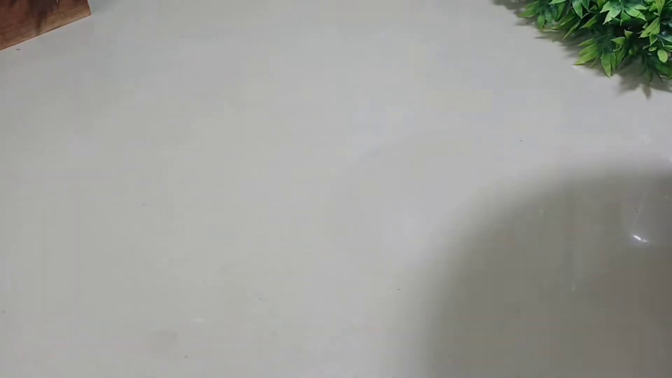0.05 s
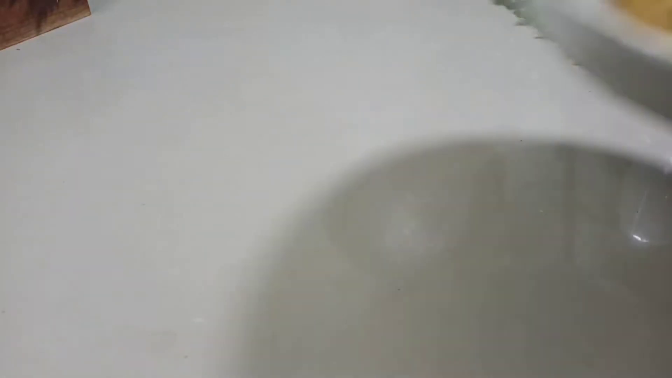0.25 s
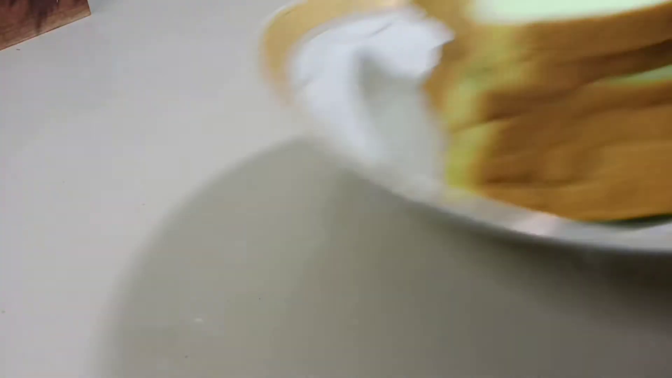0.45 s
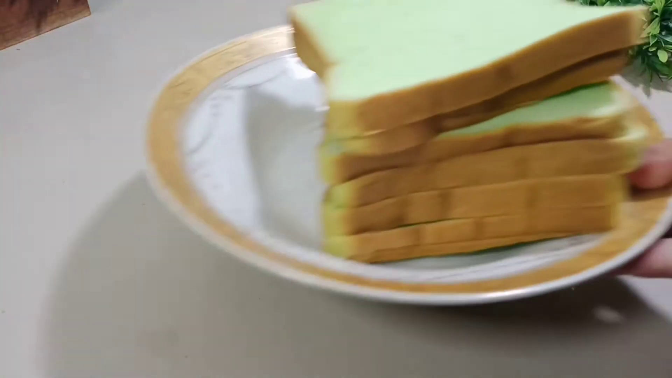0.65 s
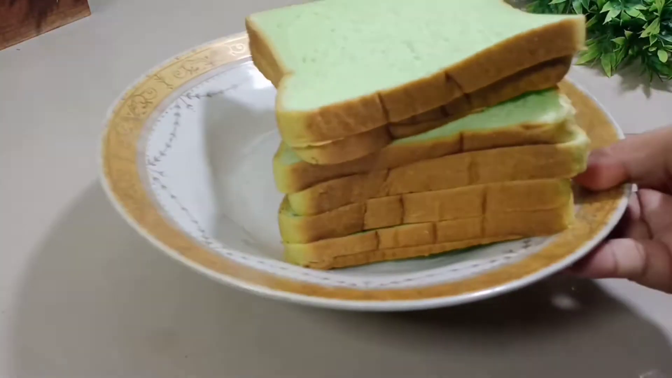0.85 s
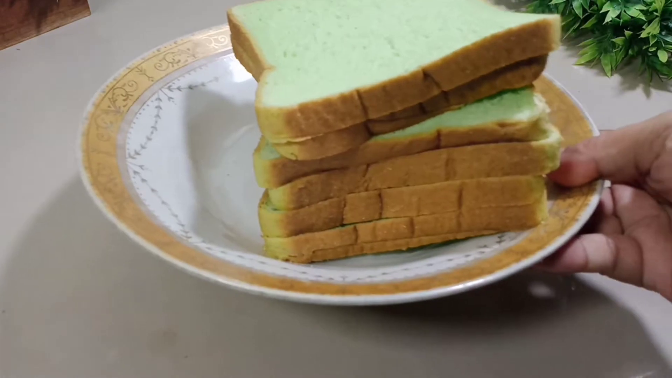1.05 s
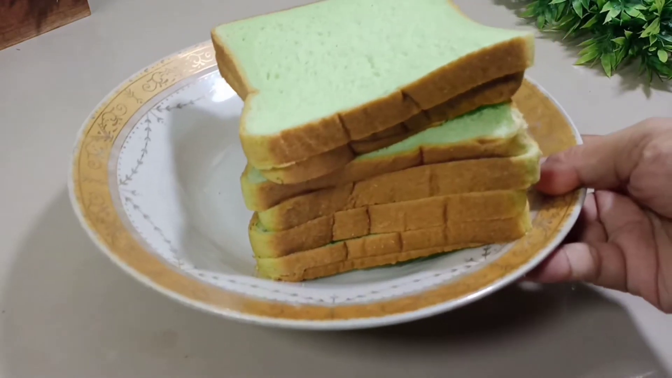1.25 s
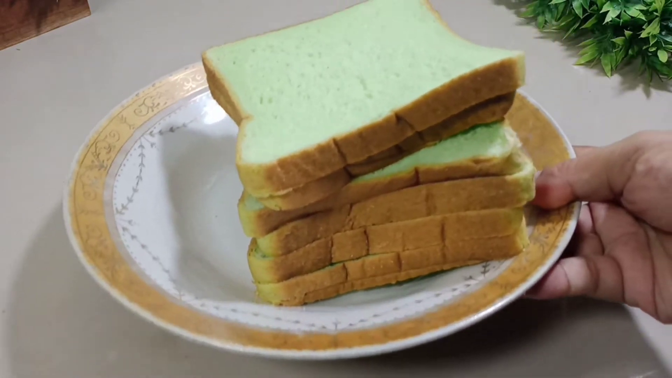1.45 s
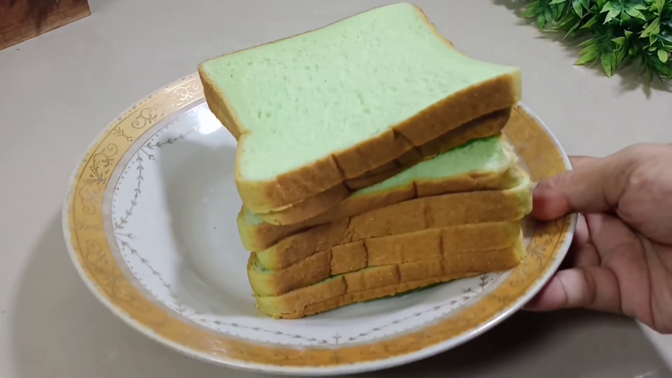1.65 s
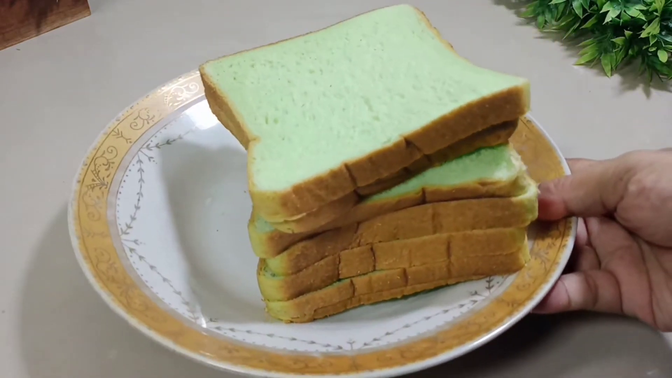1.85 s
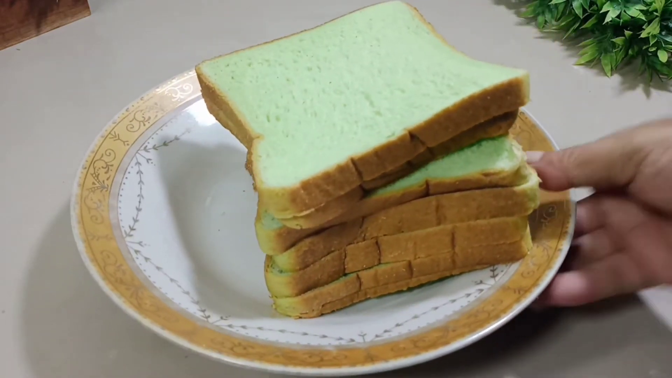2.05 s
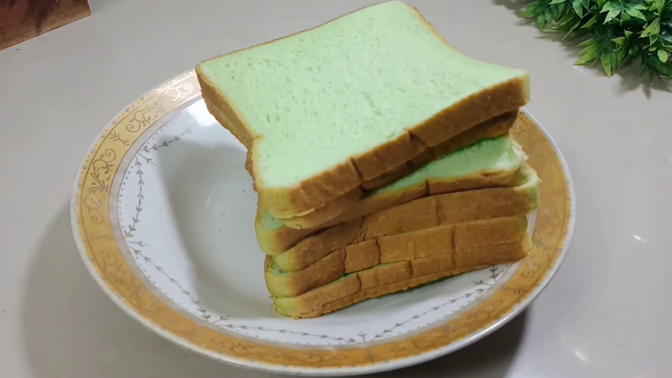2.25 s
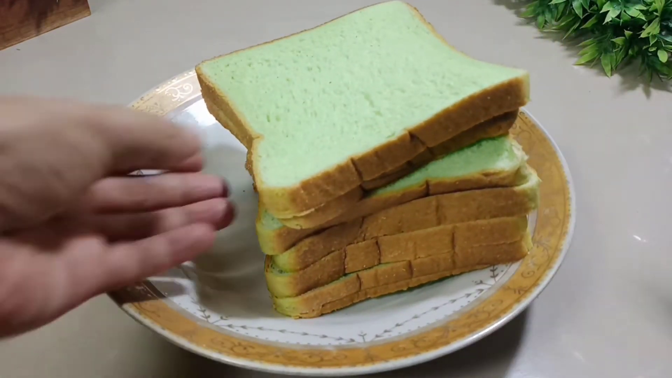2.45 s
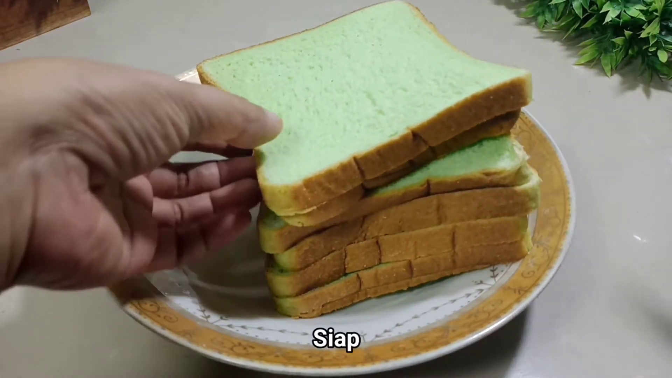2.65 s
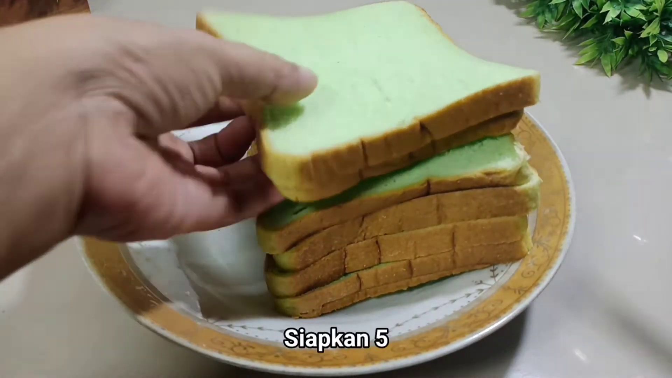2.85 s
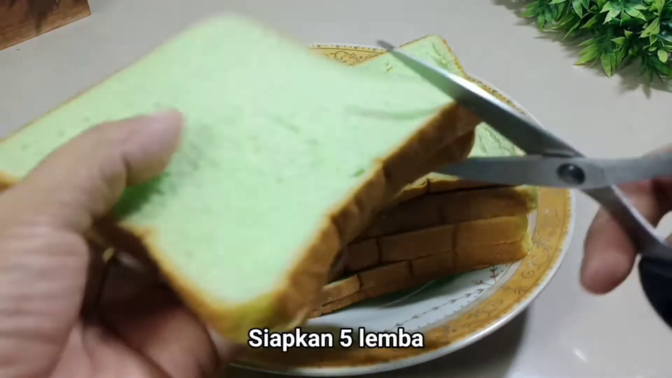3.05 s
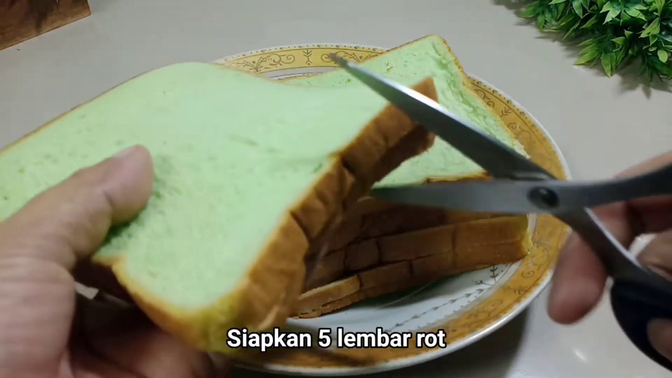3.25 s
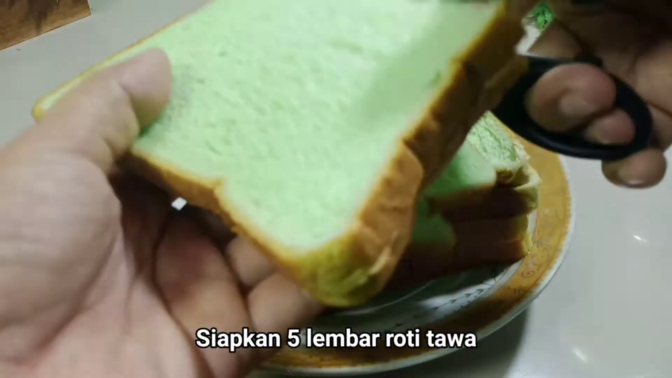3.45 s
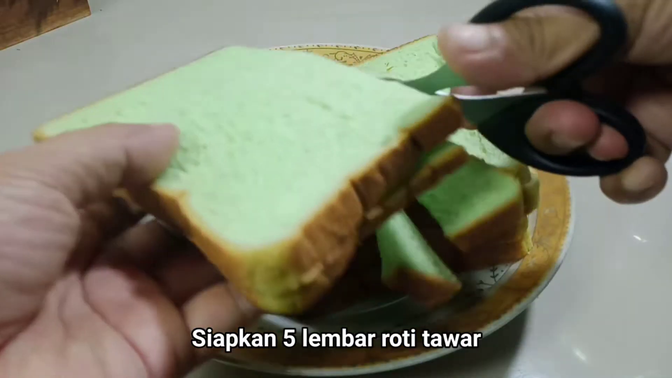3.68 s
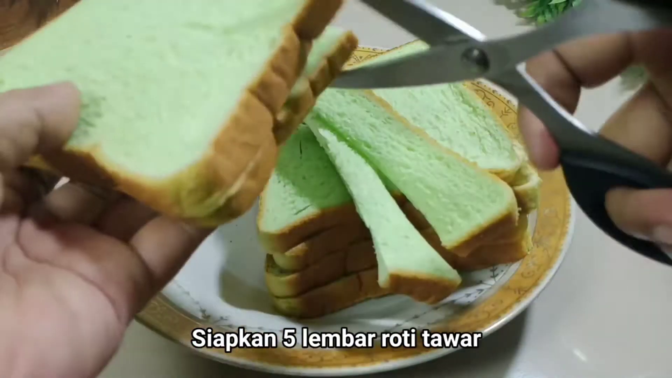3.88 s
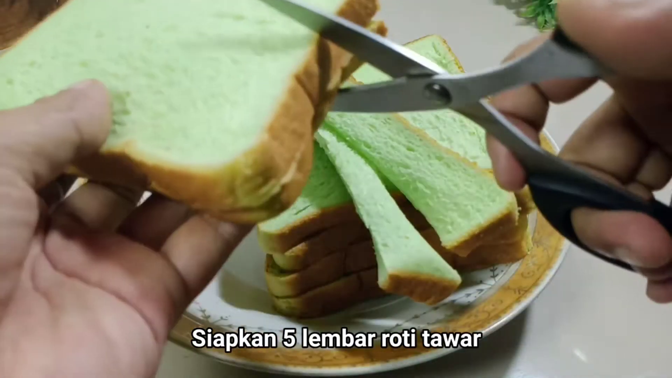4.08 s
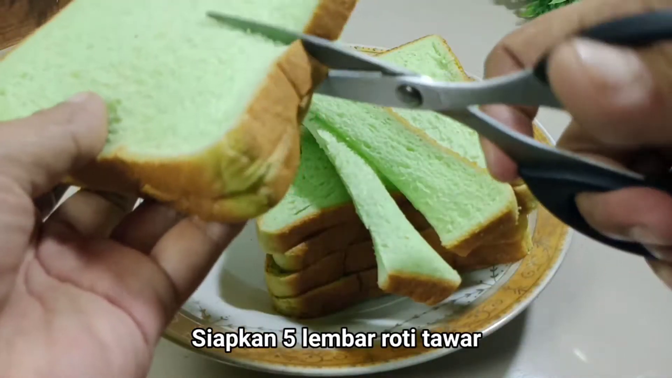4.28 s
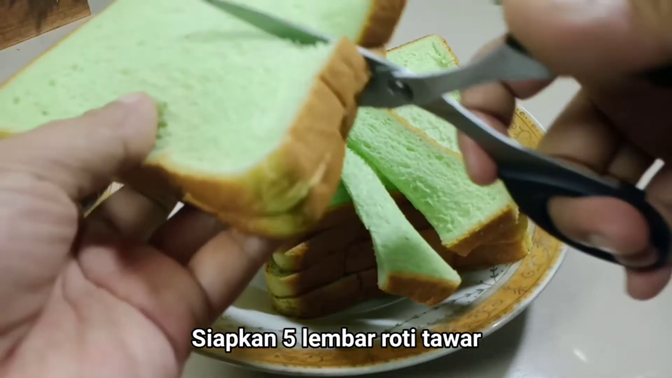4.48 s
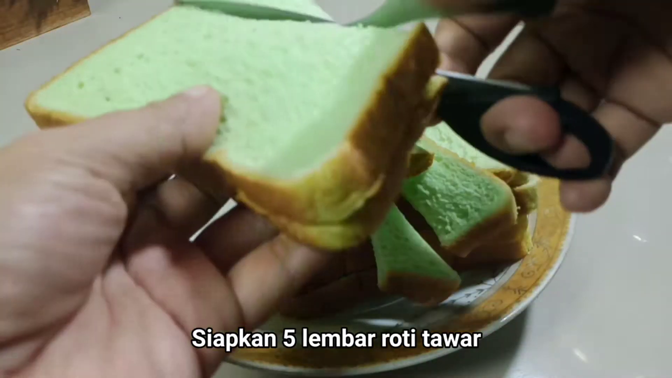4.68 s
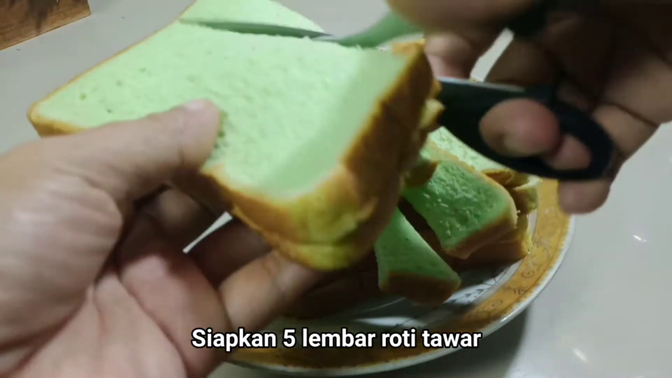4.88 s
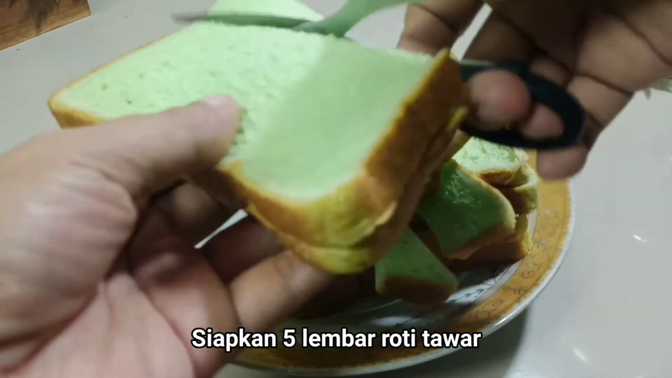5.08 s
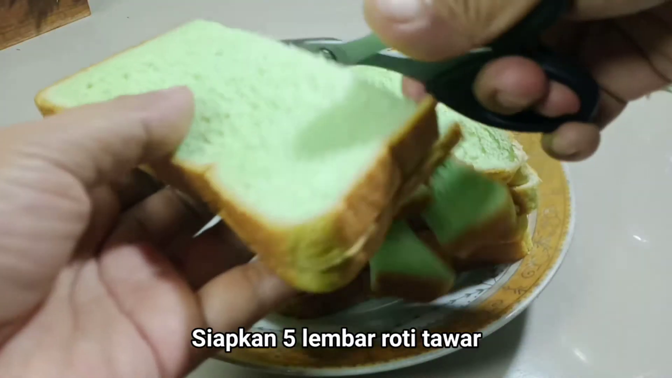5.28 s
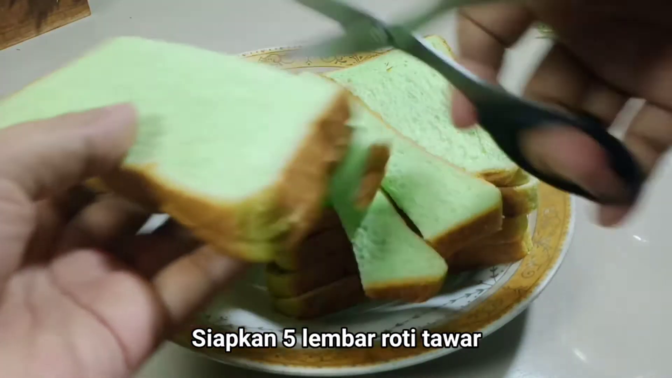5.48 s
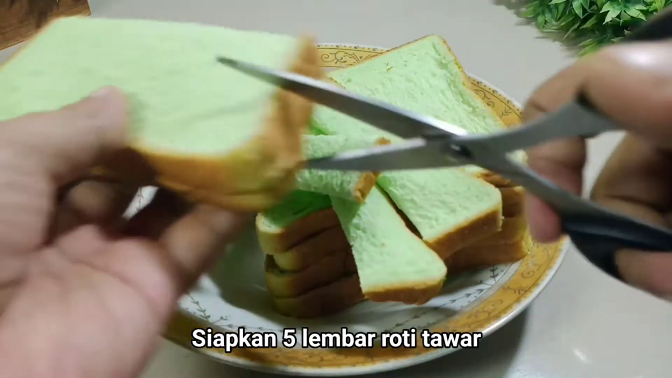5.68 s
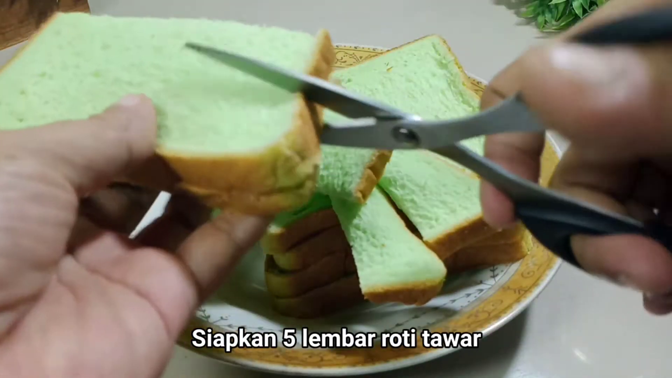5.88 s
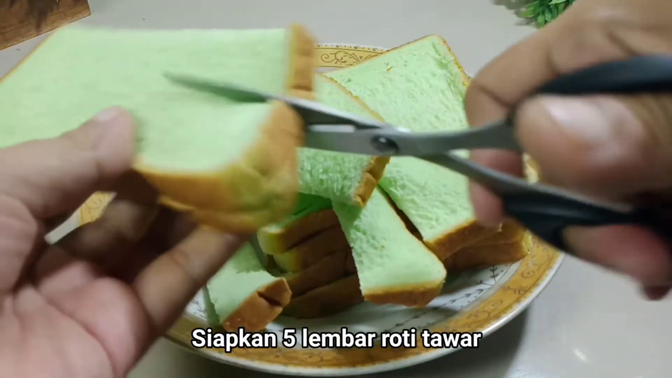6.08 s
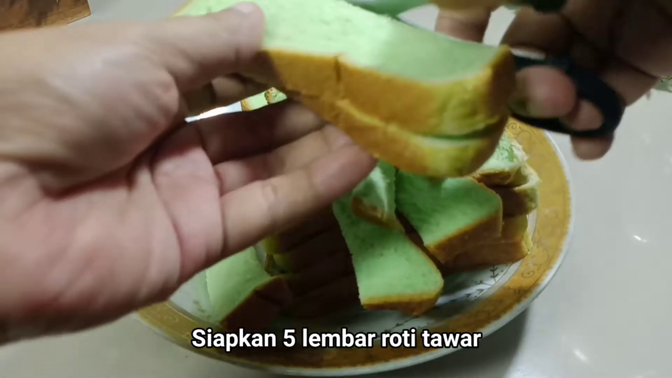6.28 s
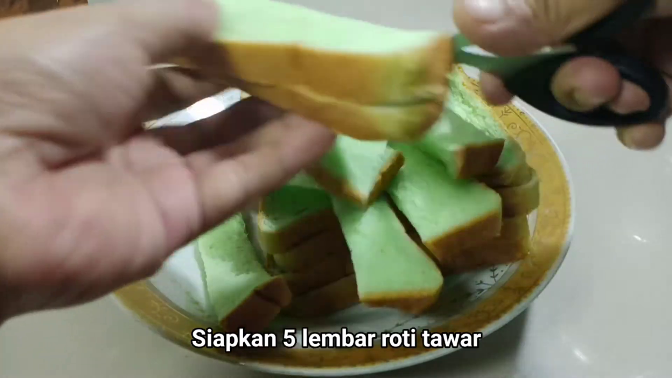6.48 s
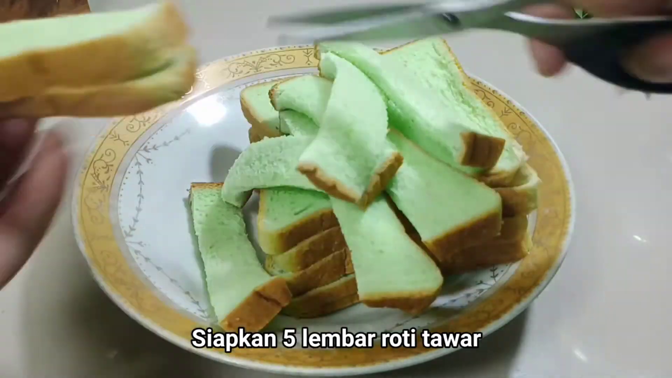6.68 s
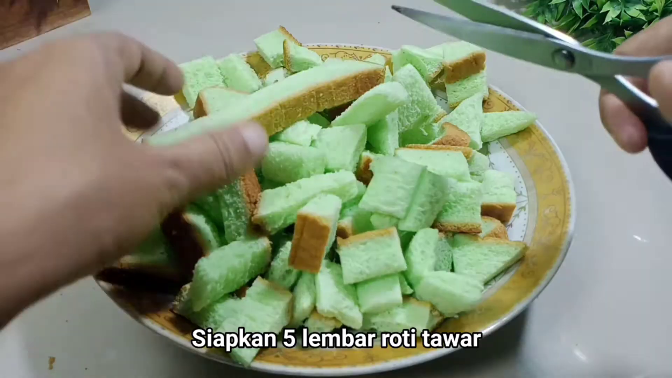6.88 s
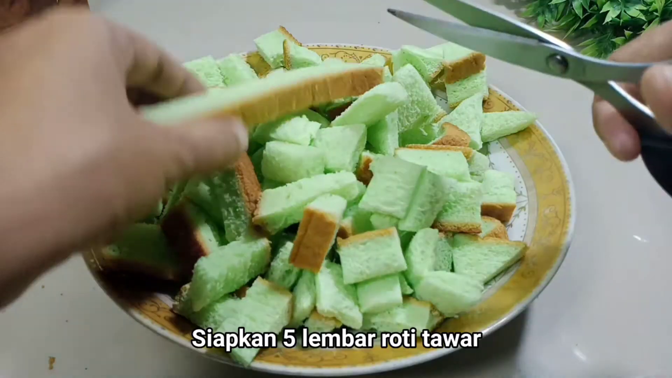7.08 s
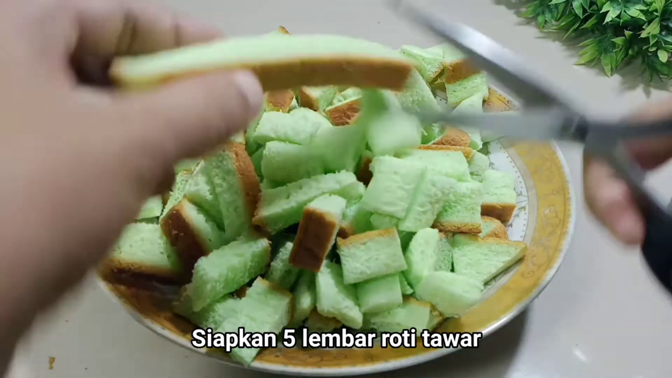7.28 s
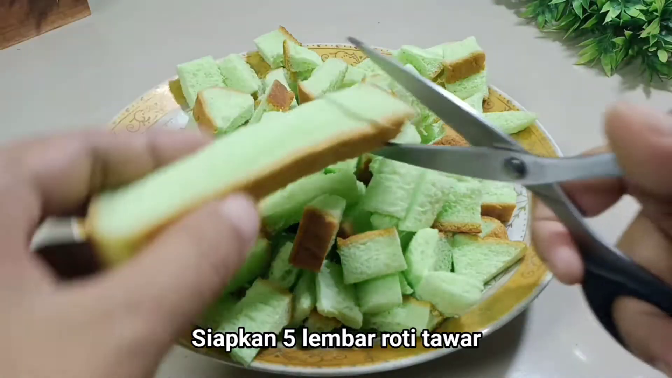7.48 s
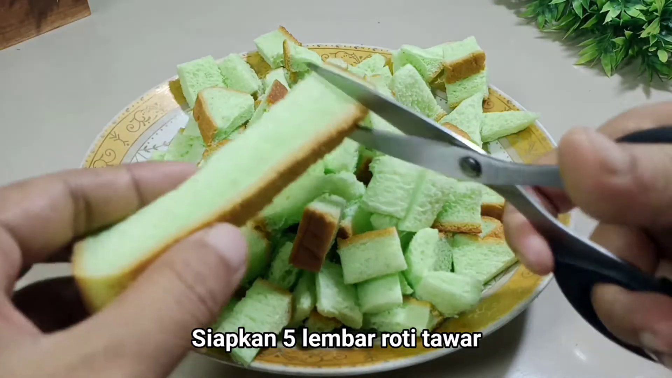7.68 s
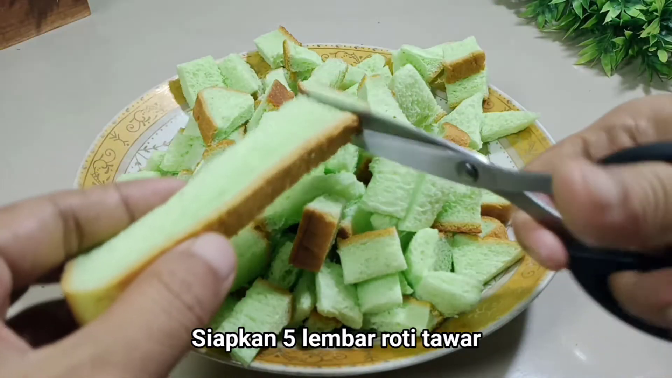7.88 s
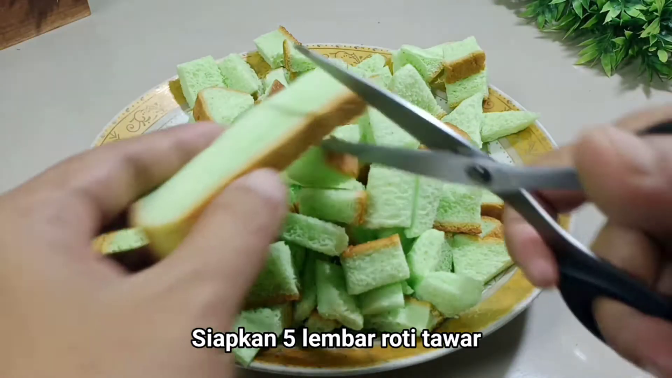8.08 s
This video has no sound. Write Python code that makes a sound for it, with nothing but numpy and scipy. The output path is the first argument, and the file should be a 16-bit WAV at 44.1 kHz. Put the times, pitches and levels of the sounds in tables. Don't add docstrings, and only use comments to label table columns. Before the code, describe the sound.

A dry hinge squeals and falls in pitch, roughening into a creak, with soft rustles and a motor idling beyond the wall. A heavy plate bumps the counter twice in short clattering bursts, its rim barely chinking. Then almost nothing until bright scissor blades snap shut four times, unevenly loud, with light ticks and faint gritty sliding between. Close microphone in a small reflective kitchen; background level jumps between scenes.

```python
import sys
import numpy as np
from scipy import signal
from scipy.fft import rfft, irfft
from scipy.io import wavfile
from scipy.ndimage import uniform_filter1d

SR = 44100
rng = np.random.default_rng(int(sys.argv[2]) if len(sys.argv) > 2 else 0)


def materialize(psi):
    bounded = np.clip(np.atleast_2d(psi).T, -1, 1)
    quanta = np.round(bounded * 32767).astype(np.int16)
    wavfile.write(sys.argv[1], SR, quanta)


def amplitude_ratio(level_db):
    exponent = np.asarray(level_db, float) / 20
    return 10 ** exponent


N = 358974

# start in seconds, end in seconds.
SHOTS = [
    (0, 1.02),
    (1.02, 2.52),
    (2.52, 3.5),
    (3.5, 4.75),
    (4.75, 5.5),
    (5.5, 6.94),
    (6.94, 8.14),
]
SPEEDS = [1, 1, 1.38, 1.8, 1.017, 1.62, 1]

# rumble, street drone, room air and hiss, all levels in dB.
SHOT_TONE = [(-58, -49, -51, -57), (-71.5, -65, -67.5, -73), (-81.5, -69.5, -72.5, -80.5),
             (-92.5, -70.5, -73.5, -80.5), (-73, -65, -67.5, -78), (-76.5, -72.5, -75.5, -82),
             (-73, -66.5, -69, -79)]
# low edge in Hz, high edge in Hz.
LAYER_EDGES_HZ = [(56, 92), (100, 580), (650, 5300), (6000, 13000)]
# frequency in Hz, level per Hz in dB.
TONE_COLOUR = [(24, -38), (40, -8.5), (91, 0), (143, -5), (218, -11), (325, -9.5), (449, -15.5),
               (1680, -24), (7340, -29.5), (8520, -29.5), (15500, -33)]
# middle in seconds, half length in seconds, lift in dB.
RUMBLE_SWELLS = [(0.0, 0.795, 9.5), (1.03, 0.0702, 4), (1.42, 0.0931, 6), (2.3, .12, 0.5), (4.99, 0.097, 7.5),
                 (5.26, .12, 8), (6.997, .1, 8.5)]
DRONE_SWELLS = [(0.05, .2, 8), (.88, 0.14815, 11.158), (1.0, 0.0423, 4.91), (1.03, 0.1757, 9), (1.8, .1, 9),
                (8.13, 0.0708, 5)]
AIR_SWELLS = [(.2, 0.15785, 6.903), (.86, 0.12046, 12.509), (1.03, 0.08114, 7.84), (1.3, .3, 4),
              (1.76, .04, 12), (2.081, 0.02308, 8.44), (8.01, .03, 6)]
HISS_SWELLS = [(.2, 0.129, 1.49), (.8, 0.1583, 10.945), (1.08, 0.2616, 8.2), (1.4, 0.1762, 1.908),
               (1.78, .1, 6), (2.07, 0.01996, 8.55), (3.7, .05, 2.994), (4.99, 0.0527, 6.765),
               (7.976, 0.013, 14.01), (8.03, 0.06188, 15)]
# time in seconds, fade out in seconds, fade in in seconds, depth in dB.
SOFT_CUTS = [(2.52, 0.05948, .01, -4), (4.752, 0.0697, .13, -15), (6.94, .1, .08, -7)]
# start in seconds, end in seconds, gain in dB.
FADE = [(6.315, 6.35, -8.5)]
GROUND_DB = -92

# time in seconds, slips per second, level in dB.
SQUEAL = [(.43, 2070, -52), (.47, 2025, -38), (.54, 1955, -40), (.6, 1835, -40), (.675, 1610, -45),
          (.715, 1410, -42), (.772, 1265, -44), (.788, 1020, -52), (.86, 780, -55)]
# frequency in Hz, gain in dB.
HINGE_BODY = [(800, 4.5), (2000, 3.5), (2900, -1), (3600, -3), (4100, -11.5), (5000, -11.5), (6000, -8),
              (7000, -13), (8000, -17), (10000, -16.5), (12000, -32.5), (15000, -23)]
# start in seconds, length in seconds, pitch in Hz, level in dB,
# glide as a share of pitch.
WHISTLES = [
    (0.03427, 0.1187, 2740, -52, 0.01142),
    (0.01234, 0.09617, 3110, -52.5, -0.05),
    (.28, .185, 3180, -45.5, -.055),
    (.49, 0.044, 3040, -52, -0.0238),
    (.44, 0.08374, 1420, -50.5, -0.01488),
    (.385, 0.06104, 2040, -64.5, 0.0112),
]
# multiple of the pitch, level in dB.
WHISTLE_ORDERS = [(1, 3.5), (2, -11), (3, -25)]
# start in seconds, length in seconds,
# slips per second, level in dB, glide as a share.
GROAN = (.78, .33, 152, -43, .06)
# multiple of the slip rate, level in dB.
GROAN_ORDERS = [(1, -2.5), (2, -13.5), (3, -17.5), (4, -18), (6, -15.5)]
# start in seconds, length in seconds, firings per second, level in dB, glide as a share.
MOTOR = (.22, .51, 63, -44, .005)
# multiple of the firing rate, level in dB.
MOTOR_ORDERS = [(1, -36), (2, 1.5), (3, -9.5), (4, -9), (5, -7), (6, -19), (7, -17)]
# start in seconds, length in seconds, pitch
# in Hz, level in dB, glide as a share.
DRONES = [(0.063, 0.08097, 259.2, -41.5, .01), (1.037, 0.28, 74.29, -63, -.03),
          (1.499, 0.3054, 69.64, -60, .05), (1.85, .67, 73, -62.5, 0.001), (2.6, .45, 368, -78, .01),
          (3.15, 0.38853, 110, -69, -.02), (3.47, 1.22, 625, -79.5, -.005), (3.6, 1.12, 146, -76.5, -.07),
          (4.16, 0.515, 212.5, -71.5, .03)]
CLEAN_JITTER, RAGGED_POWER, MOST_JITTER = .004, 7.1, 0.049
WHISTLE_JITTER, BREATHY_JITTER = 0.004546, 0.02789
MOTOR_JITTER, GROAN_JITTER, DRONE_WANDER_HZ = 0.010007, 0.03121, 1.5
WHISTLE_EDGE_S, MOTOR_EDGE_S = 0.01182, .045
WHISTLE_SAG_DB, MOTOR_RISE_DB, GROAN_RISE_DB = -3, 1.5, 6
EDGE_DB = -15.5

# time in seconds, peak in dB, main resonance in Hz, rattle in seconds.
LATCH = [
    (0.0955, -29, 4817, 0.00668),
]
# time in seconds, peak in dB.
RUSTLES = [(0.1734, -43.5), (0.2099, -44.5), (0.2785, -41), (0.4013, -51), (0.4522, -48.5), (0.5296, -41),
           (1.0231, -49.5), (1.061, -55.5), (1.1766, -51.5), (1.2327, -50), (1.3523, -55.5), (1.4391, -55)]
RUSTLE_HZ, RUSTLE_S = 12102, .004

# time in seconds, peak in dB, main resonance in Hz, rattle in seconds.
KNOCKS = [(1.5895, -0.4189, 1348, 0.003), (1.592, -5.5, 1322, 0.002825), (1.595, -8.5, 330, 0.006),
          (1.8, -20, 1253, 0.002204), (1.822, -7, 727.5, 0.004388), (1.833, -8.5, 838, 0.009167),
          (1.842, -1.5, 1403, 0.0036), (1.845, -4.5, 770, 0.005), (1.922, -15, 848, 0.0061),
          (1.925, -11, 660.8, 0.00105)]
# frequency in Hz, level per Hz in dB.
PLATE = [(59, -55.5), (100, -26.5), (313, -5.5), (614, -8.5), (742, -3.5), (977, -9.5), (1370, -7.5),
         (1880, -12), (2270, -10.5), (4020, -21.5), (4280, -20.5), (6120, -28.5), (8580, -23),
         (9740, -32.5), (15500, -46.5)]
# start in seconds, end in seconds, gain in dB.
DUCKS = [(1.708, 1.795, -5), (1.968, 2.197, -8)]
# time in seconds, level in dB.
CHINK = (2.081, -60)
# frequency in Hz, level in dB, time to fade by 60 dB in seconds.
RIM = [(2558, 4, 0.1), (3418.3, 6, 0.11), (4446, -1, 0.078), (5688.6, 2, 0.14), (6886.3, 1.5, 0.15),
       (8373, -0.5, 0.098), (9902, -9.5, .1), (11612, -9, 0.0609)]

# time in seconds, peak in dB, main resonance in Hz, rattle in seconds.
SHUTS = [
    (3.6784, -11, 3760, 0.0012),
    (5.297, -2, 2200, 0.0009233),
    (6.42, -12.5, 3170, 0.001),
    (7.988, -5, 2503, 0.0006996),
]
# frequency in Hz, level per Hz in dB.
BLADES = [(88, -47), (150, -20), (279, -23.5), (631, -33.5), (1940, -11), (2760, -18.5), (3480, -14.5),
          (3830, -16.5), (4560, -12), (6600, -11), (8490, -1.5), (9360, -4.5), (10900, -12.5),
          (12000, -7.5), (15500, -19.5)]
# time in seconds, peak in dB, main resonance in Hz.
OPENS = [(3.767, -31, 2510), (5.457, -24.5, 1300), (6.55, -32, 2200), (8.106, -22.5, 3130)]
# frequency in Hz, level per Hz in dB.
PIVOT = [(290, -59.5), (500, -24.5), (1370, -1), (1670, -6), (2390, -13.5), (3430, -3.5), (3850, -10.5),
         (5430, -10.5), (5830, -5), (7560, -3.5), (9240, 6), (10800, -10), (14800, -5), (15500, -14.5)]
# middle in seconds, half length in seconds, level in dB.
SLIDES = [(4.08, .02, -87), (4.319, 0.04486, -86), (4.45, .05, -80.5), (4.56, .02, -85.5),
          (4.66, 0.02953, -82.5), (5.56, .05, -80), (5.75, .03, -77), (5.91, .04, -89),
          (6.02, 0.031, -81.5), (6.135, .045, -72.5), (6.26, .03, -82)]
SHEAR_S, SHEAR_DB = .0013, -15
SNIP_HOLD_S, SNIP_DUCK_DB = .055, -4
REBOUND_S, REBOUND_DB, REBOUND_HZ, OPEN_RATTLE_S = .0055, -11, 3295, 0.0018

# frequency in Hz, time to fade by 60 dB in seconds.
ROOM_T60 = [(200, 0.61), (1000, 0.4), (4000, 0.41), (12000, 0.3)]
ROOM_LIFT_SHARE = 0.62
ONSET_LAG_S = 0.0008
SOFT_KNEE_HZ = 2988
# centre in Hz, width in Hz.
MIC_PEAK = (8480, 800)
NEAR_LIFT_DB = 3.5
FAR_LIFT_DB = [7.438, 2.3, 5.8, 1.5, 3.7, 1.5, 2.7]
CHANNEL_GAP_DB = -32


def rms_one(x):
    return x / np.sqrt(np.mean(x ** 2) + 1e-20)


def at_hz(points, hz):
    point_hz, value = np.array(points)[:, :2].T
    return np.interp(np.log(hz + 1), np.log(point_hz), value)


def add(out, start, x):
    ends = [round(b * SR) for a, b in SHOTS if b * SR > start + 1]
    end = min(ends + [N, start + len(x)])
    out[start:end] += x[:end - start]


def speed_at(s):
    return SPEEDS[sum(s >= b for a, b in SHOTS[:-1])]


def drift(size, rate):
    r = np.exp(-2 * np.pi * rate / SR)
    noise = rng.standard_normal(size + 8000)
    return rms_one(signal.lfilter([1], [1, -2 * r, r * r], noise)[8000:])


def band(x, low_hz, high_hz):
    edges = [low_hz, min(high_hz, SR / 2.1)]
    return signal.sosfilt(signal.butter(2, edges, "band", fs=SR, output="sos"), x)


def bell(t, s, half):
    return np.exp(-((t - s) / half) ** 2)


def suppression(dips, size):
    db = np.zeros(N)
    for start, end, dip_db in dips:
        db[round(start * SR):round(end * SR)] = dip_db
    return amplitude_ratio(uniform_filter1d(db, size=size))


def room_echo(speed):
    t = np.arange(SR // 2) * speed / SR
    out = 0
    for hz in 125 * 2 ** np.arange(8):
        noise = band(rng.standard_normal(len(t)), hz * speed / 2 ** .5, hz * speed * 2 ** .5)
        out = out + noise * amplitude_ratio(-60 * t / at_hz(ROOM_T60, hz))
    early = 1 + amplitude_ratio(0.5) * np.exp(-t / .007)
    return out * early * np.clip(t / 0.00093, 0, 1) / np.sqrt(SR / 100)


def room_tone():
    out = np.zeros(N)
    layer_swells = [RUMBLE_SWELLS, DRONE_SWELLS, AIR_SWELLS, HISS_SWELLS]
    for (a, b), levels_db, speed in zip(SHOTS, SHOT_TONE, SPEEDS):
        t = np.arange(round(a * SR), min(round(b * SR), N)) / SR
        size = len(t)
        hz = np.arange(size // 2 + 1) * SR / size
        colour = amplitude_ratio(at_hz(TONE_COLOUR, hz / speed))
        for db, (low, high), swells in zip(levels_db, LAYER_EDGES_HZ, layer_swells):
            db = db + sum(lift_db * bell(t, s, half) for s, half, lift_db in swells if a <= max(s, 0) < b)
            noise = irfft(rfft(rng.standard_normal(size)) * colour, size)
            layer = rms_one(band(noise, low * speed ** 0.85, high * speed ** 0.65))
            add(out, round(a * SR), layer * amplitude_ratio(db + 0.47 * drift(size, 1.6)))
    out += amplitude_ratio(GROUND_DB) * rms_one(band(rng.standard_normal(N), 22, 70))
    t = np.arange(N) / SR
    dips_db = sum(np.interp(t, [s - down, s, s + up], [0, db, 0]) for s, down, up, db in SOFT_CUTS)
    return out * amplitude_ratio(dips_db)


def span_of(rows):
    s, *columns = np.transpose(rows)
    at = np.arange(round(s[0] * SR), min(round(s[-1] * SR), N))
    return at[0], [np.interp(at / SR, s, c) for c in columns]


def note(s, length, hz, db, glide, jitter, edge_s, rise_db):
    s, edge_s = max(s, 0), min(edge_s, length / 3)
    shape = [(0, EDGE_DB), (edge_s, 0), (length - edge_s, rise_db), (length, rise_db + EDGE_DB)]
    return [(s + at, hz * (1 + glide * at / length), db + lift_db, jitter) for at, lift_db in shape]


def tone(rows, orders, wobble_rate, flutter_db, body=((1, 0), (2, 0))):
    start, (hz, db, jitter) = span_of(rows)
    unsteady_hz = hz * (1 + np.abs(jitter) * drift(len(hz), wobble_rate))
    phase = 2 * np.pi * np.cumsum(unsteady_hz) / SR
    wave = 0
    for k, level_db in orders:
        flutter = flutter_db * drift(len(hz), wobble_rate / 3)
        strength = amplitude_ratio(level_db + at_hz(body, k * hz) + flutter)
        wave = wave + strength * (k * hz < SR / 2.7) * np.sin(k * phase)
    return start, np.sqrt(2) * amplitude_ratio(db) * wave * signal.windows.tukey(len(hz), .12)


def hinge_squeal():
    out = np.zeros(N)
    for k, row in enumerate(WHISTLES):
        jitter = BREATHY_JITTER if k < 2 else WHISTLE_JITTER
        rows = note(*row, jitter, WHISTLE_EDGE_S, WHISTLE_SAG_DB)
        add(out, *tone(rows, WHISTLE_ORDERS, wobble_rate=210.2, flutter_db=2.5))
    squeal = []
    for s, hz, db in SQUEAL:
        ragged = CLEAN_JITTER * (SQUEAL[0][1] / hz) ** RAGGED_POWER
        squeal.append((s, hz, db, min(ragged, MOST_JITTER)))
    orders = [(k, 0) for k in range(1, 17)]
    add(out, *tone(squeal, orders, wobble_rate=57, flutter_db=2.0, body=HINGE_BODY))
    wet = signal.fftconvolve(out[:round(SHOTS[0][1] * SR)], room_echo(0.83375))
    add(out, 0, amplitude_ratio(-8.5) * wet)
    return out


def motors():
    out = np.zeros(N)
    for row in DRONES:
        rows = note(*row, DRONE_WANDER_HZ / row[2], MOTOR_EDGE_S, 0)
        add(out, *tone(rows, [(1, 0.00583)], wobble_rate=23, flutter_db=2.5))
    rows = note(*MOTOR, MOTOR_JITTER, MOTOR_EDGE_S, MOTOR_RISE_DB)
    add(out, *tone(rows, MOTOR_ORDERS, wobble_rate=13.88, flutter_db=2.5))
    return out


def causal(db):
    cepstrum = irfft(db * np.log(10) / 20)
    half = len(cepstrum) // 2
    cepstrum[1:half] *= 2
    cepstrum[half + 1:] = 0
    return irfft(np.exp(rfft(cepstrum)))[:half]


def blows(events, echoes, colour, lift_db, room_db, lead_s, lead_db, bright_db, soften=0):
    out = np.zeros(N)
    hz = np.arange(2049) * SR / 4096
    for s, peak_db, main_hz, rattle_s in events:
        speed, s = speed_at(s), s + ONSET_LAG_S
        t = np.arange(-SR // 50, SR // 20) * speed / SR
        swell = amplitude_ratio(lead_db) * np.exp(np.minimum(t, 0) / lead_s)
        decay = np.exp(-np.abs(t) / max(rattle_s, 1e-4))
        contacts = rng.standard_normal(len(t)) * np.where(t < 0, swell, decay)

        octaves = np.log2((hz + 20) / main_hz)
        main_db = lift_db * np.exp(-(octaves / 0.36) ** 2)
        db = at_hz(colour, hz / speed) + main_db + bright_db * np.clip(octaves, -3.2, 3)
        db = db + soften * peak_db * np.clip(np.log2((hz + 20) / SOFT_KNEE_HZ), 0, 3)
        chance_db = 10 * np.log10(uniform_filter1d(np.abs(rfft(contacts, 4096)) ** 2, size=40))
        body = signal.fftconvolve(contacts, causal(db - chance_db))
        gain = amplitude_ratio(peak_db) / np.abs(body).max()
        add(out, round(s * SR) - SR // 50, gain * body)

        blurred_db = uniform_filter1d(db - (1 - ROOM_LIFT_SHARE) * main_db, size=8)
        echo = signal.fftconvolve(causal(blurred_db), echoes[speed][rng.integers(3)])
        add(out, round(s * SR), gain * amplitude_ratio(room_db) * echo)
    return out


def latch_click(echoes):
    return blows(LATCH, echoes, PLATE, lift_db=14.5, room_db=5.2378, lead_s=0.00197, lead_db=-18, bright_db=3.0)


def finger_rustles(echoes):
    rustles = [(s, db, RUSTLE_HZ, RUSTLE_S) for s, db in RUSTLES]
    return blows(rustles, echoes, BLADES, lift_db=11.0, room_db=-3.5, lead_s=.003, lead_db=-4.0, bright_db=3.0)


def hinge_groan():
    out = np.zeros(N)
    rows = note(*GROAN, GROAN_JITTER, MOTOR_EDGE_S / 3, GROAN_RISE_DB)
    add(out, *tone(rows, GROAN_ORDERS, wobble_rate=48.62, flutter_db=2.0))
    return out


def plate_knocks(echoes):
    knocks = blows(KNOCKS, echoes, PLATE, lift_db=4.0, room_db=-11.5, lead_s=.001, lead_db=-46.0,
                   bright_db=0.3803, soften=.22)
    return knocks * suppression(DUCKS, size=200)


def ring(x, hz, t60):
    r = amplitude_ratio(-60 / (t60 * SR))
    w = 2 * np.pi * min(hz, SR / 2.2) / SR
    return signal.lfilter([0, np.sin(w)], [1, -2 * r * np.cos(w), r * r], x)


def rim_chink():
    start_s, level_db = CHINK
    touch = np.zeros(SR // 4)
    touch[0] = amplitude_ratio(level_db)
    out = np.zeros(N)
    add(out, round(start_s * SR), sum(amplitude_ratio(db) * ring(touch, hz, min(t60, .09)) for hz, db, t60 in RIM))
    return out


def scissors_shut(echoes):
    shear = dict(lift_db=4.5, lead_s=SHEAR_S, lead_db=SHEAR_DB)
    out = blows(SHUTS[:-1], echoes, BLADES, room_db=-14.5, bright_db=0.4601, **shear)
    out += blows(SHUTS[-1:], echoes, BLADES, room_db=-19.0, bright_db=-2.0, **shear)
    dips = [(s + SNIP_HOLD_S / speed_at(s), s + .5, SNIP_DUCK_DB) for s, *rest in SHUTS]
    return out * suppression(dips, size=200)


def scissors_open(echoes):
    ticks = []
    for s, db, hz in OPENS:
        ticks.append((s, db, hz, OPEN_RATTLE_S))
        ticks.append((s + REBOUND_S, db + REBOUND_DB, REBOUND_HZ, OPEN_RATTLE_S))
    return blows(ticks, echoes, PIVOT, lift_db=3.0, room_db=-13.0, lead_s=.001, lead_db=-38.5, bright_db=1.1797)


def blade_slides():
    t = np.arange(N) / SR
    uneven = rng.standard_normal(N) * amplitude_ratio(3.0 * drift(N, 200))
    grit = rms_one(band(uneven, 11000, 21000))
    return grit * sum(amplitude_ratio(db) * bell(t, s, half) for s, half, db in SLIDES)


def port(x, lifts_db):
    out = x.copy()
    hz, width = MIC_PEAK
    for (a, b), speed, db in zip(SHOTS, SPEEDS, lifts_db):
        part = slice(round(a * SR), round(b * SR))
        peak = band(x[part], (hz - width / 2) * speed, (hz + width / 2) * speed)
        out[part] += (amplitude_ratio(db) - 1) * peak
    return out


def scene():
    echoes = {speed: [room_echo(speed) for place in range(3)] for speed in sorted(set(SPEEDS))}
    far = room_tone() * suppression(FADE, size=1500)
    near = hinge_squeal() + motors() + latch_click(echoes) + finger_rustles(echoes) + hinge_groan()
    near += plate_knocks(echoes) + rim_chink()
    near += scissors_shut(echoes) + scissors_open(echoes) + blade_slides()
    heard = port(near, [NEAR_LIFT_DB] * len(SHOTS)) + port(far, FAR_LIFT_DB)
    return np.tile(heard, (2, 1))


def low_pass(x):
    return signal.sosfilt(signal.butter(12, 16800, fs=SR, output="sos"), x)


def record(dry):
    soft = 1.0069 * np.tanh(dry / 1.0372)
    waver = amplitude_ratio(CHANNEL_GAP_DB) * drift(N, 1500)
    apart = soft * (1 + waver * np.array([[1], [-1]]))
    top_cut = signal.cheby2(14, 26, 15800, fs=SR, output="sos")
    return low_pass(signal.sosfilt(top_cut, apart))


dry = scene()
out = record(dry)
materialize(out)
```